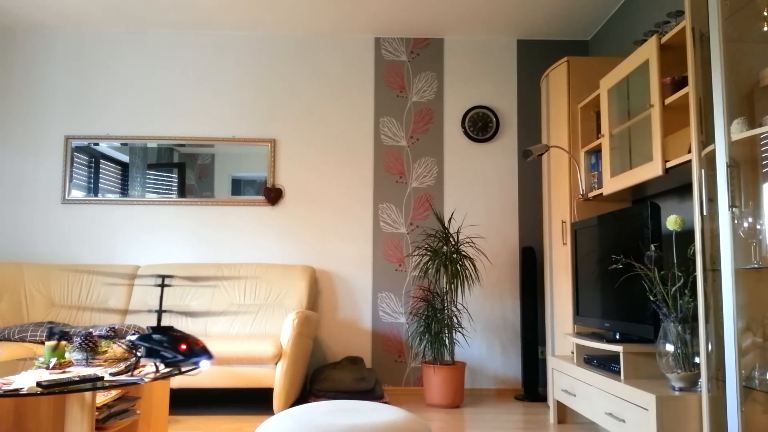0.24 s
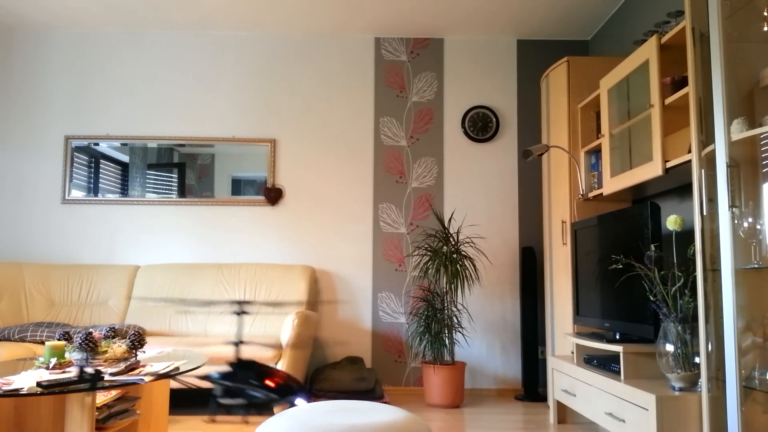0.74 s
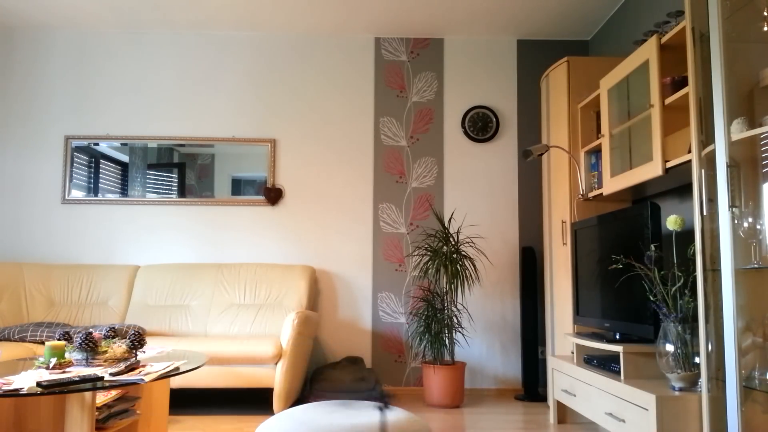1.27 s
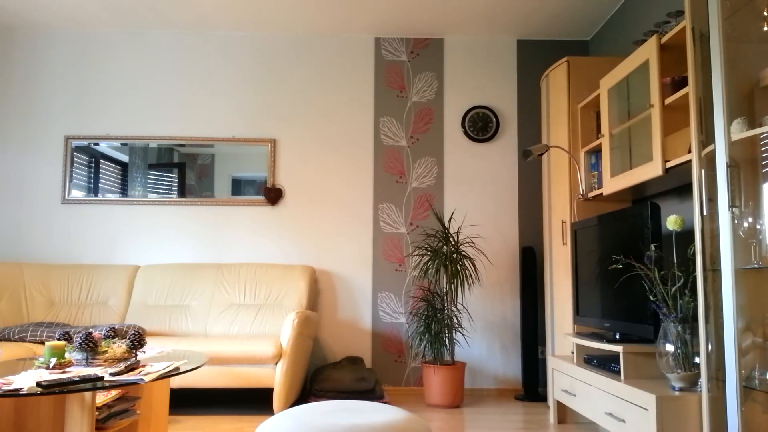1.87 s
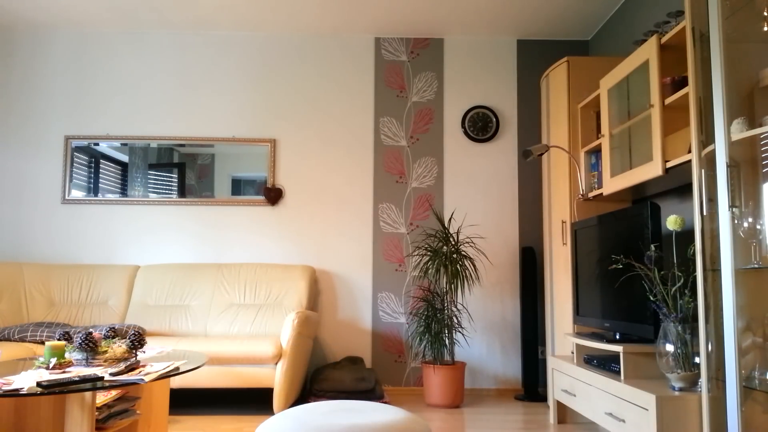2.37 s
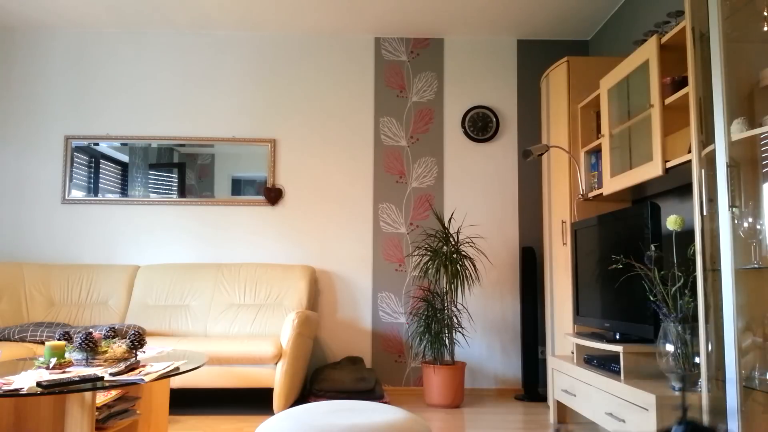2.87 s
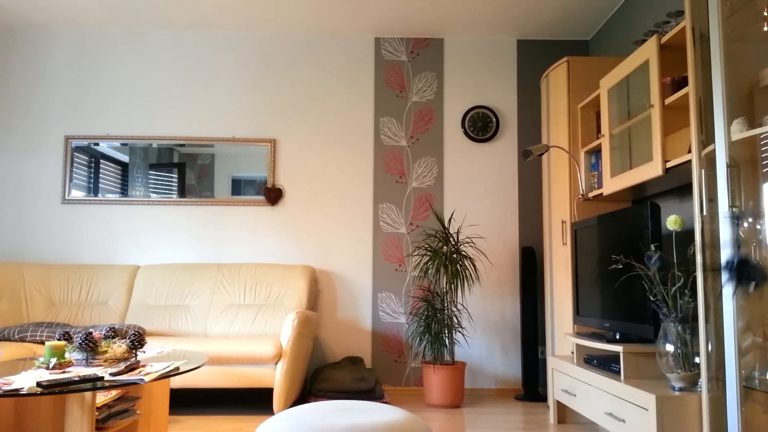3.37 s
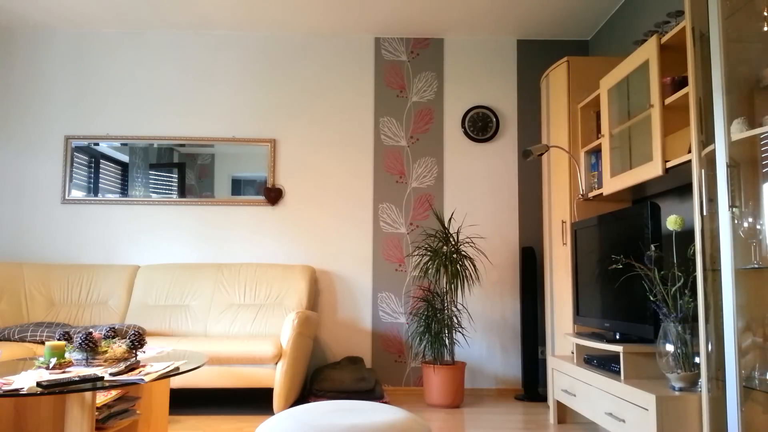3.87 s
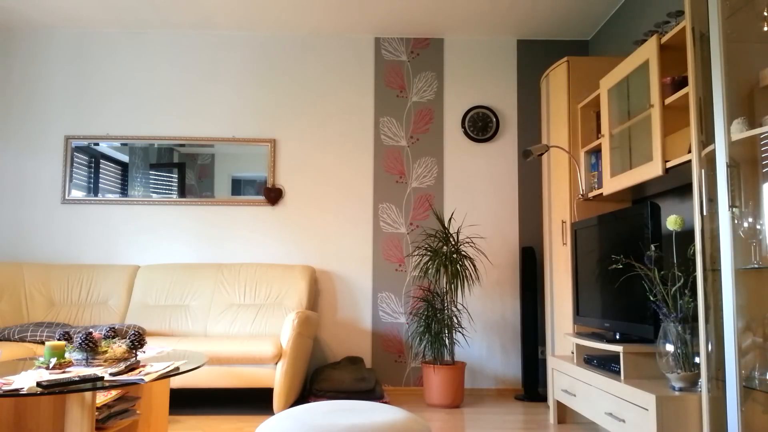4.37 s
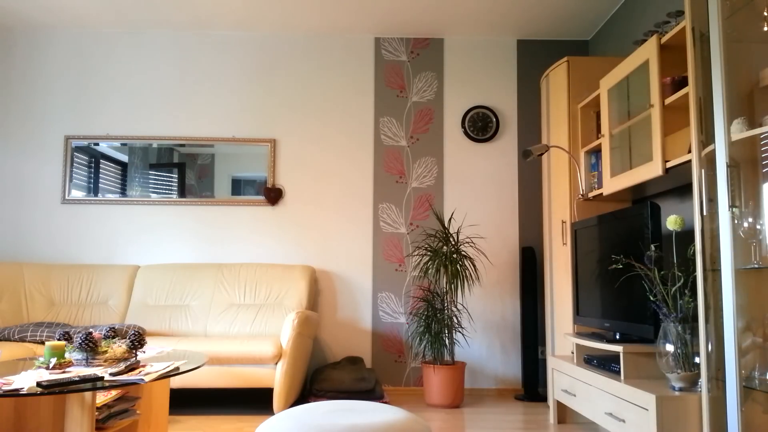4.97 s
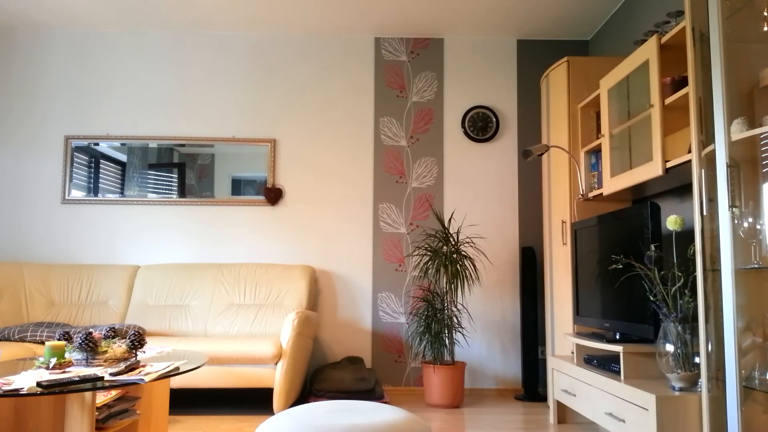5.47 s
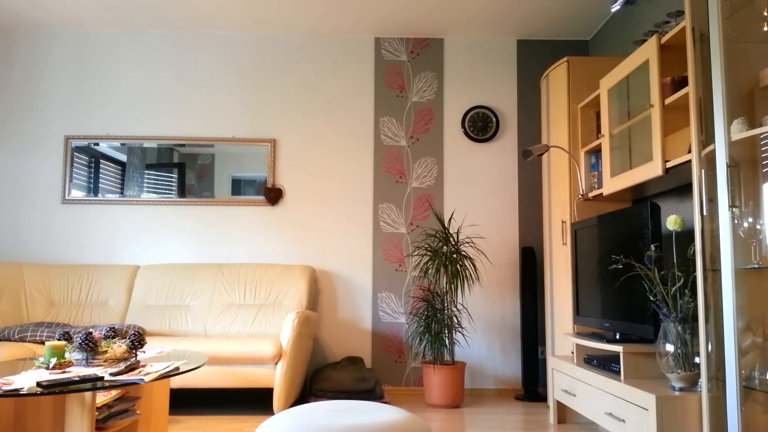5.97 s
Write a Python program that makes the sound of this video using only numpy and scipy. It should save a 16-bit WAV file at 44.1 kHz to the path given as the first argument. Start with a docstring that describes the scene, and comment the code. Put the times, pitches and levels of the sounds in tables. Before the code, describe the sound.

A toy helicopter is already flying in a furnished living room. Two tiny motors give a piercing, slightly detuned whine with gritty gear rasp and fluttering rotor air beneath. It passes fairly close to a still stereo microphone, surges in short bursts, climbs a little in pitch, then drops lower and moves off, still running at the end.

```python
"""Coaxial model helicopter crossing a living room

It flies left to right past a still camera; two motors whine and beat as throttle and steering move.
Each seven-tooth pinion drives a 70-tooth rotor gear: sines at shaft multiples, with fuzz round the strong ones.
Tooth noise is filtered into rasp and frame rattle; pulsed noise and rotor multiples make the blades.
Port delays move the direct sound; sparse decaying reflections make the room.
"""
import sys
import numpy as np
from scipy import signal
from scipy.fft import rfft, irfft
from scipy.io import wavfile
from scipy.ndimage import map_coordinates

SR = 44100
rng = np.random.default_rng(int(sys.argv[2]) if len(sys.argv) > 2 else 0)


def store_wav(level_fs):
    """Save 16-bit WAV to argv[1]."""
    pcm = np.round(np.clip(np.atleast_2d(level_fs), -1, 1) * 32767)
    wavfile.write(sys.argv[1], SR, pcm.T.astype(np.int16))


N = 275184
TIME = np.arange(N) / SR
PINION_TEETH, GEAR_TEETH = 7, 70


def amp(db):
    """Amplitude ratio of a level in dB."""
    return 10 ** (np.asarray(db) / 20)


def unit(x):
    """Scales x to rms 1."""
    return x / np.sqrt(np.mean(x ** 2) + 1e-20)


def curves(rows):
    """Table columns after the first, joined by straight lines in time."""
    s, *columns = np.transpose(rows)
    return [np.interp(TIME, s, c) for c in columns]


def read(points, hz):
    """Table values over hz, interpolated on a log-frequency axis."""
    f, value = np.transpose(points)
    return np.interp(np.log(hz + 1), np.log(f + 1), value)


def colour(x, points, share=1):
    """Filters x by a spectrum in dB, scaled by share."""
    gain_db = share * read(points, np.fft.rfftfreq(N, 1 / SR))
    return irfft(rfft(x) * amp(gain_db), N)


def drift(rate_hz):
    """Smooth noise of rms 1, rolled off around rate_hz."""
    f = np.fft.rfftfreq(N, 1 / SR)
    lowpass = np.exp(-(f / rate_hz) ** 2) * (f > 0)
    return unit(irfft(rfft(rng.standard_normal(N)) * lowpass, N))


def tone(turns):
    """Sine of rms 1 with a random start phase."""
    return np.sqrt(2) * np.sin(2 * np.pi * (turns + rng.random()))


def swell(middle_s, half_s):
    """Gaussian bell in time, height 1."""
    return np.exp(-((TIME - middle_s) / half_s) ** 2)


def kick(start_s, rise_s, decay_s):
    """Straight rise to 1, then exponential fall."""
    age_s = TIME - start_s
    return np.clip(age_s / rise_s, 0, 1) * np.exp(-np.maximum(age_s - rise_s, 0) / decay_s)


def room(x, alike):
    """Sparse reflections decaying band by band; the two ports share part of them."""
    # columns: freq_hz, t60_s
    t60 = [(150, 0.33), (1000, 0.46), (3000, 0.93), (8000, 0.29), (14000, 0.23)]
    taps = rng.standard_normal((2, SR // 2)) * (rng.random((2, SR // 2)) < .1)
    taps[:, :130] = 0  # gap before the first reflection
    alike = np.clip(alike, 0, 1)
    taps[1] = alike * taps[0] + np.sqrt(1 - alike ** 2) * taps[1]
    hz, t, z = signal.stft(taps, SR, nperseg=256)
    decay = np.exp(-np.log(1000) * t / read(t60, hz)[:, None])
    tail = signal.istft(z * decay, SR, nperseg=256)[1]
    tail /= np.linalg.norm(tail, axis=1, keepdims=True)
    lead = tail.shape[1]  # the room is already ringing at the start
    padded = np.pad(x, (lead, 0), "reflect")[None]
    return signal.fftconvolve(padded, tail, axes=1)[:, lead:lead + N]


def place(x, lag):
    """Direct sound at the two ports, the left one later by lag samples."""
    ports = [map_coordinates(x, [np.arange(N) + side * lag / 2], order=3, mode="nearest")
             for side in (-1, 1)]
    return np.array(ports)


def hum(freq_hz=560, level_db=-60.5):
    """One steady sine."""
    return amp(level_db) * tone(freq_hz * TIME)


def downdraught(middle_s=.97, gust_db=-67, half_s=0.12, top_hz=130):
    """A soft puff of rotor air, low noise under a bell, early in the flight."""
    band = signal.butter(2, [45, top_hz], "band", fs=SR, output="sos")
    puff = signal.sosfilt(band, rng.standard_normal((2, N)))
    return amp(gust_db) * swell(middle_s, half_s) * unit(puff)


def wash(rotors, spectrum, chop):
    """Turbulent air: coloured noise pulsing twice per rotor turn, as each blade passes."""
    noise = sum(rng.standard_normal(N) * (1 + chop * tone(2 * r)) for r in rotors)
    return unit(colour(noise, spectrum))


def overtones(turns, orders, fade_db, fade_hz):
    """Multiples of a turning rate, each fading at random on its own."""
    return sum(amp(db + fade_db * drift(fade_hz)) * tone(k * turns) for k, db in orders)


def murmur(rotors, order=24, middle_s=1.34, half_s=0.5, level_db=-58):
    """A higher blade tone of each rotor swells once, early in the flight."""
    return amp(level_db) * swell(middle_s, half_s) * sum(tone(order * r) for r in rotors)


def rotor_air(rotors, level_db, surge_db, blade_db):
    """Blades stir the air: broad wash, low thrum, and tones at multiples of the rotor speed."""
    # relative noise spectra; columns: freq_hz, density_db_per_hz
    wash_spectrum = [(25, -46), (60, -39), (105, -28), (190, -10.5), (300, -3), (500, -2), (1000, 1.5),
                     (1300, -5), (1700, -11), (2500, -8), (5000, -18.5)]
    thrum_spectrum = [(25, -47), (50, -40), (75, -19), (100, -13), (140, 5), (170, 6), (220, -10),
                      (320, -46), (800, -68)]
    # blade tones before blade_db; columns: rotor_multiple, relative_level_db
    blades = [(4, -68.5), (6, -70), (12, -71.5)]
    air = amp(-47 + 0.29 * level_db + 0.59 * surge_db) * wash(rotors, wash_spectrum, chop=0.27)
    air += amp(-65 + 0.16 * blade_db + 0.52 * surge_db) * wash(rotors, thrum_spectrum, chop=0.46)
    air += amp(blade_db) * sum(overtones(r, blades, fade_db=1.5, fade_hz=3.0) for r in rotors)
    return air + murmur(rotors)


def drone(rotor_b, drone_db, order=8):
    """One multiple of rotor B's speed, at a level that moves in time."""
    return amp(drone_db + 7.5) * tone(order * rotor_b)


def shaft(speed, jitter=0.0009, jitter_hz=30):
    """Turns of a motor shaft: integrated speed (turns per s) with a slight flutter."""
    return np.cumsum(speed * (1 + jitter * drift(jitter_hz))) / SR


def rotor_turns(turns):
    """The gear slows the rotor by the tooth ratio."""
    return turns * PINION_TEETH / GEAR_TEETH


def wobble(turns, depth, sway):
    """Off-centre gear and passing blades rock the mesh: its gain, and the turns the teeth feel."""
    rotor = rotor_turns(turns)
    rock = [unit(sum(tone(k * rotor) / np.sqrt(k) for k in range(1, 5)) + .5 * drift(100))
            for _ in range(2)]
    return 1 + depth * rock[0], turns + sway * rock[1] / PINION_TEETH


def teeth(turns, memory, scrape, throb, size=128):
    """Teeth strike and slide; gear flaws return each rotor turn, pinion roughness partly each shaft turn."""
    mesh = turns * PINION_TEETH
    tooth = mesh.astype(int)
    at = np.flatnonzero(np.diff(tooth))
    flaws = rng.standard_normal(GEAR_TEETH)
    strike = (flaws - flaws.mean())[tooth[at] % GEAR_TEETH]
    # split each strike between two samples
    late = (tooth[at + 1] - mesh[at]) / (mesh[at + 1] - mesh[at])
    ticks = np.zeros(N)
    ticks[at], ticks[at + 1] = strike * (1 - late), strike * late
    # one row of flank roughness per shaft turn
    flanks = signal.lfilter([1], [1, -memory], rng.standard_normal((N // 100, size)), axis=0)
    slide = map_coordinates(flanks.ravel(), [turns * size], order=3) * np.exp(-(mesh % 1))
    rotor = rotor_turns(turns)
    load = np.exp(throb * (tone(rotor) + tone(2 * rotor) + tone(turns)))
    return unit(load * (np.sqrt(1 - scrape) * unit(ticks) + np.sqrt(scrape) * unit(slide)))


def frame_rattle(turns_ab, level_db, kicks, db_per_kick=.6):
    """Tooth knocks ring the light frame, louder with each turn per s of a steering kick."""
    # relative frame spectrum; columns: freq_hz, density_db_per_hz
    frame = [(300, -100), (1800, -55), (2240, -29), (2380, -3), (2520, 0), (2640, -7), (2780, -1),
             (2920, -3), (3080, -20), (3600, -45), (8000, -80)]
    knocks = sum(teeth(turns, memory=.55, scrape=.55, throb=.15) for turns in turns_ab)
    return amp(-50.5 + 0.15 * level_db + db_per_kick * abs(kicks)) * unit(colour(knocks, frame))


def gear_rasp(turns_ab, level_db, treble_db=0.4):
    """Scraping teeth as coloured noise, with a slight lift above 6 kHz."""
    # relative spectrum before the treble lift; columns: freq_hz, density_db_per_hz
    spectrum = [(200, -80), (1000, -78), (1350, -16.5), (1750, -14.5), (2240, -4.5), (2500, 5),
                (3300, -3.5), (4400, -5.5), (5050, -1.5), (5450, -5), (5800, -11.5), (8000, -9.5),
                (8800, -16), (10300, -14.5), (11400, -21), (12600, -14.5), (14300, -45.5)]
    clatter = sum(teeth(turns, memory=.6, scrape=.82, throb=.09) for turns in turns_ab)
    rasp = unit(colour(clatter, spectrum))
    treble = signal.sosfiltfilt(signal.butter(2, 6000, "high", fs=SR, output="sos"), rasp)
    return amp(-39 + level_db) * (rasp + (amp(treble_db) - 1) * treble)


def side_tones(motor, turns, orders, level_db, fade_db=2, fade_hz=3):
    """Shaft multiples, each fading on its own; the rocking mesh blurs the high ones most."""
    # single side tones lifted or dipped for a while as the craft moves
    # columns: middle_s, half_length_s, motor, shaft_multiple, lift_db
    flares = [(0.13, 0.37, "A", 1, 9), (1.01, 0.09, "A", 1, 7), (0.54, 0.56, "A", 10, 17),
              (0.56, 0.15, "A", 3, 13), (0.73, 0.4, "B", 3, 9), (0.83, 0.21, "A", 5, 10),
              (1.2, .15, "B", 12, 4), (0.89, 0.21, "A", 14, 6), (1.55, 0.38, "B", 6, 10),
              (2.1, 0.36, "A", 5, 15), (2.25, 0.34, "B", 12, -7), (2.5, 0.38, "B", 10, 6.5),
              (3.72, 0.16, "B", 8, 13), (2.14, 0.76, "A", 9, 11), (3.55, 0.2, "A", 9, 9),
              (2.6, 0.34, "B", 14, 4.5), (3.18, 0.6, "B", 14, 11.5), (4.2, 1.5, "A", 6, 6),
              (3.3, 0.63, "A", 15, 15), (3.55, 0.69, "B", 11, 14), (3.5, 0.24, "A", 3, 6),
              (4.66, 0.7, "A", 1, 8.5), (4.8, 0.19, "B", 1, 17), (4, 0.3, "A", 1, 2.5),
              (5.1, 0.95, "B", 14, 10)]
    gain, rocked = wobble(turns, depth=.16, sway=.035)
    out = 0
    for k, db in orders:
        flare_db = sum(lift_db * swell(s, half_s) for s, half_s, which, order, lift_db in flares
                       if which == motor and order == k)
        tone_db = db + flare_db + 0.99 * level_db + fade_db * drift(fade_hz)
        out = out + amp(tone_db) * tone(k * rocked)
    return gain * out


def grind(turns_a, turns_b, width_hz=85, upper_db=-2):
    """Uneven tooth contact wraps each strong tone in a narrow fuzz that glides with it."""
    meshes = [(PINION_TEETH * turns_a, 0), (PINION_TEETH * turns_b, 0),
              ((PINION_TEETH + 1) * turns_a, upper_db)]
    fuzz = 0
    for mesh, db in meshes:
        envelope = drift(width_hz) + 1j * drift(width_hz)
        fuzz = fuzz + amp(db) * (envelope * np.exp(2j * np.pi * mesh)).real
    return unit(fuzz)


def whine(turns_a, turns_b, fade_db=1.6, fade_hz=7):
    """Both mesh tones (order 7), fading together, and motor A's order 8."""
    # slow relative levels; columns: time_s, a7_db, a8_db, b7_db
    slow_levels = [(0.0,-39,-28,-33.5), (1.1,-32.5,-29.5,-27.5), (1.6,-39.5,-25.5,-38),
                   (2.1,-35.5,-29.5,-32.5), (2.7,-28,-31,-28), (3.15,-28.5,-28.5,-25.5),
                   (3.38,-37,-30.5,-29), (3.52,-35.5,-25,-28), (3.95,-33,-30.5,-24.5), (4.3,-30,-31,-27),
                   (4.55,-31,-32.5,-32.5), (4.9,-31,-27,-28), (5.2,-25.5,-28.5,-35), (5.5,-38.5,-30,-30),
                   (6.24,-50,-29.5,-29.5)]
    # brief swells and dips of single whine tones as the craft crosses the room's standing waves
    # columns: middle_s, half_length_s, a7_change_db, a8_change_db, b7_change_db
    swells = [(0.38,0.055,6,8.5,9.5), (0.463,0.022,14,-1,5), (0.57,0.061,13.5,-9,5), (0.739,0.031,15,2,3),
              (0.79,0.03,-7,-2,-5), (0.91,0.085,9,-0.5,7), (1,0.054,6,3.5,0), (1.23,0.087,2.5,2.5,7.5),
              (1.3,0.034,7,-22,-3), (1.736,0.056,16,6.5,-10), (2.18,0.051,10.5,2,0), (2.388,0.087,11,5,9.5),
              (2.63,0.03,-3,3,-17), (2.94,0.16,3,-2.5,5.5), (3.15,0.023,0,-10,5.5), (3.77,0.033,7,4,10.5),
              (4.16,0.26,6,-2,4.5), (4.76,0.023,-6,-4,2), (5.37,0.059,3,-6,-4), (5.78,0.027,7,-12,2),
              (5.921,0.085,-6,8.5,3)]
    swells_db = sum(np.outer(changes_db, swell(s, half_s)) for s, half_s, *changes_db in swells)
    pair_db, single_db = fade_db * drift(fade_hz), fade_db * drift(fade_hz)
    a7_db, a8_db, b7_db = np.array(curves(slow_levels)) + swells_db + [pair_db, single_db, pair_db]
    gain_a, a = wobble(turns_a, depth=.13, sway=.026)
    gain_b, b = wobble(turns_b, depth=.13, sway=.026)
    motor_a = amp(a7_db) * tone(PINION_TEETH * a) + amp(a8_db) * tone((PINION_TEETH + 1) * a)
    return gain_a * motor_a + gain_b * amp(b7_db) * tone(PINION_TEETH * b)


def scene():
    """Both drives and rotors, heard directly and through the room."""
    # mean shaft speed of the motors; columns: time_s, speed_turns_per_s
    throttle_rows = [(0, 344), (0.4, 342.2), (0.5, 343.8), (0.8, 340.4), (1.4, 340.2), (1.85, 346.7),
                     (2.1, 354.5), (2.6, 358.7), (3.35, 360), (4.0, 360), (4.13, 363), (4.3, 359.5),
                     (4.6, 339.6), (4.75, 337.8), (4.95, 343.3), (5.3, 344.4), (5.45, 339.7), (5.8, 337.8),
                     (6.24, 336.6)]
    # slow steering, added to motor A, taken from B; columns: time_s, offset_turns_per_s
    trim = [(0.0, -7.8), (0.58, 0), (0.9, 1.1), (1.28, 0.8), (1.45, 2), (1.75, 6), (2.15, 8.45),
            (2.6, 8.05), (2.9, 4.7), (3.3, 1.8), (3.55, 0.45), (3.95, 0), (4.3, -1.1), (4.65, -1.3),
            (4.95, 1.0), (5.28, 1.5), (5.6, -2.5), (6.24, -7.4)]
    # quick steering; columns: start_s, rise_s, size_turns_per_s
    kick_rows = [(0.435, 0.05, 12), (0.93, 0.06, -5.5), (0.99, 0.09, 6.6), (2.98, 0.22, -5.8),
                 (3.79, 0.15, -4.5), (4.06, 0.06, 14.8), (5.32, 0.15, -4.0)]
    # brief surges of the drives and rotor air; columns: start_s, peak_db
    surges = [(0.32, 6.5), (0.71, 2), (0.9, 4.5), (0.96, 0.5), (1.149, 4.5), (1.68, 5), (2.08, 6),
              (2.33, 5), (2.87, 1.5), (2.96, 5), (3.131, 2.4), (3.6, 6), (3.721, 5.5), (4.05, 8)]
    # drive level as the craft nears and recedes; columns: time_s, level_db
    nearness = [(0.0, 0.6), (0.6, 3), (1.2, 4.5), (1.6, 1.5), (2.6, 5.5), (3.1, 3.5), (3.5, 0.5), (4.6, -1),
                (5.2, -3), (5.45, -1.5), (6.24, -2)]
    # columns: time_s, blade_lift_db, drone_relative_level_db
    blade_swell = [(0, -20, -73), (0.85, -0.5, -76), (1.25, -3.5, -72.5), (1.75, 4, -58.5), (2.3, 8, -69.5),
                   (2.9, 2.5, -74), (3.3, -14, -96), (3.8, 1, -80), (4.4, -11, -73.5), (5.3, -7, -60.5),
                   (6.24, -7.5, -65)]
    # direction of the craft, before each layer's share; columns: time_s, left_lag_samples
    flight = [(0, -4.5), (.5, -6), (1.5, 4.5), (3.7, 9.5), (6.24, 8.5)]
    # side tones before level and flares; columns: shaft_multiple, relative_level_db
    orders_a = [(1, -67.5), (3, -65.5), (4, -76), (5, -67), (6, -52.5), (9, -52), (10, -55.5), (11, -60.5),
                (12, -52.5), (13, -59), (14, -49), (15, -58), (16, -67), (21, -69)]
    orders_b = [(1, -76), (3, -67.5), (4, -67), (5, -62), (6, -57), (8, -44.5), (10, -53.5), (11, -55.5),
                (12, -52.5), (13, -76), (14, -51), (17, -61), (18, -59), (21, -60.5)]

    # steering speeds one motor up and slows the other
    kicks = sum(size * kick(s, rise_s, decay_s=.325) for s, rise_s, size in kick_rows)
    throttle, steering = curves(throttle_rows)[0], curves(trim)[0] + kicks
    a, b = shaft(throttle + steering), shaft(throttle - steering)
    rotors = [rotor_turns(turns) for turns in (a, b)]
    surge_db = sum(db * kick(s, rise_s=0.046, decay_s=0.052) for s, db in surges)
    level_db = curves(nearness)[0] + surge_db
    blade_db, drone_db = curves(blade_swell)
    lag = curves(flight)[0]

    air = rotor_air(rotors, level_db, surge_db, blade_db)
    rattle = frame_rattle((a, b), level_db, kicks)
    rasp = gear_rasp((a, b), level_db)
    sides = side_tones("A", a, orders_a, level_db) + side_tones("B", b, orders_b, level_db)
    sides += drone(rotors[1], drone_db)
    tones = amp(-0.53) * whine(a, b) + amp(-39.5 + 0.35 * level_db) * grind(a, b)

    # direct and room paths; the strong tones reach both ports nearly in step
    out = hum() + downdraught()
    out += amp(-5.5) * place(air, lag) + amp(-4.0) * room(air, alike=0.026)
    out += amp(-13.0) * place(rattle, 0.3 * lag) + room(rattle, alike=0.15)
    out += place(rasp, lag) + amp(1.5) * room(rasp, alike=0.012)
    out += place(sides, lag) + amp(-8.5) * room(sides, alike=0.036)
    out += place(tones, 0.31 * lag) + amp(-11) * room(tones, alike=0.15)
    return out


def record(dry):
    """Sets stereo width band by band, colours each port, then limits the band."""
    # side over mid, before the shares; columns: freq_hz, lift_db
    width = [(400, 0), (900, -2), (1080, 0.5), (1300, 9), (1750, 3.5), (2050, -3), (2500, -1.5), (2900, 0),
             (3300, 4), (4000, -1.5), (6000, 0.5)]
    # left over right, before the shares; columns: freq_hz, difference_db
    port_tilt = [(200, -2), (1200, 0), (1800, -4.5), (2100, 4.5), (2500, -7.5), (2850, 1), (3200, 3),
                 (3900, 2.5), (4700, -0.5), (6000, -3), (10000, -2.5), (11100, 0.5), (12500, 2),
                 (14000, 10.5)]
    edge_hz = 14500
    left, right = dry * signal.windows.tukey(N, .002)  # soft ends
    mid = colour((left + right) / 2, width, share=-0.35)
    side = colour((left - right) / 2, width, share=0.55)
    ports = np.array([colour(mid + side, port_tilt, share=0.63),
                      colour(mid - side, port_tilt, share=-0.68)])
    lowpass = signal.firwin(511, edge_hz, window=("kaiser", 9), fs=SR)
    return signal.oaconvolve(ports, lowpass[None], "same")


dry = scene()
out = record(dry)
store_wav(out)
```